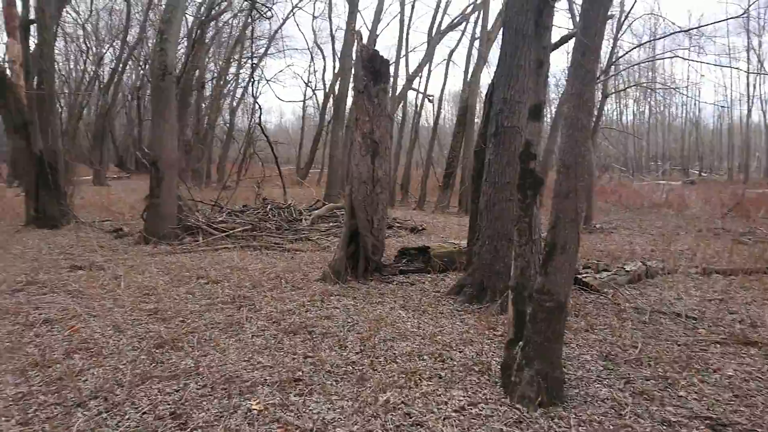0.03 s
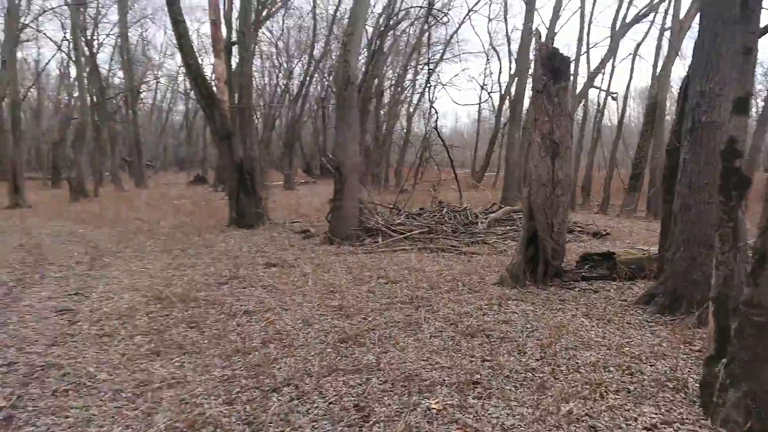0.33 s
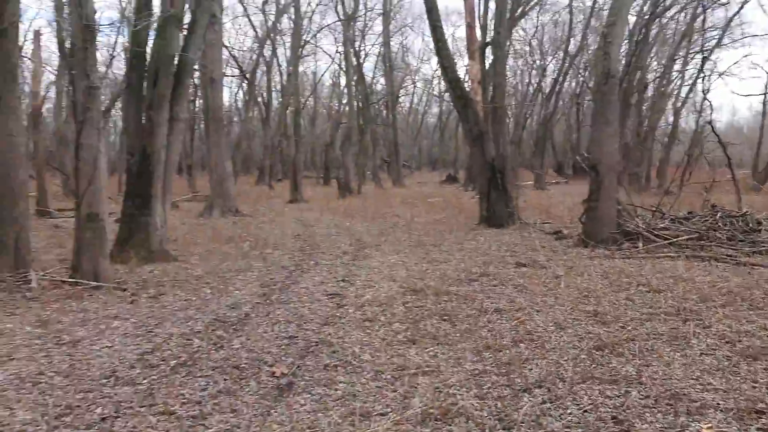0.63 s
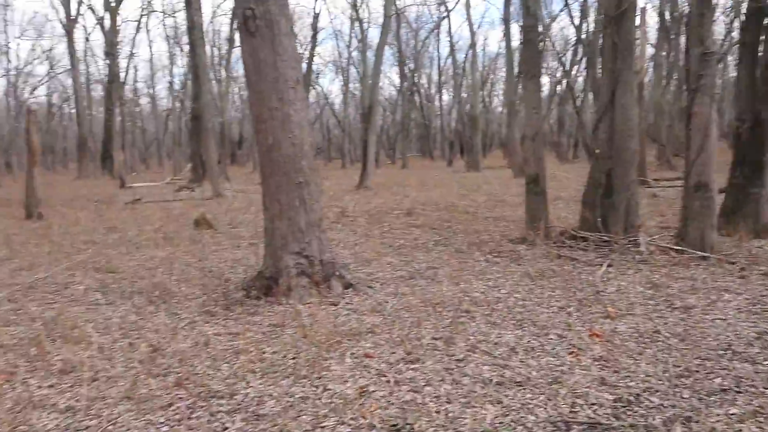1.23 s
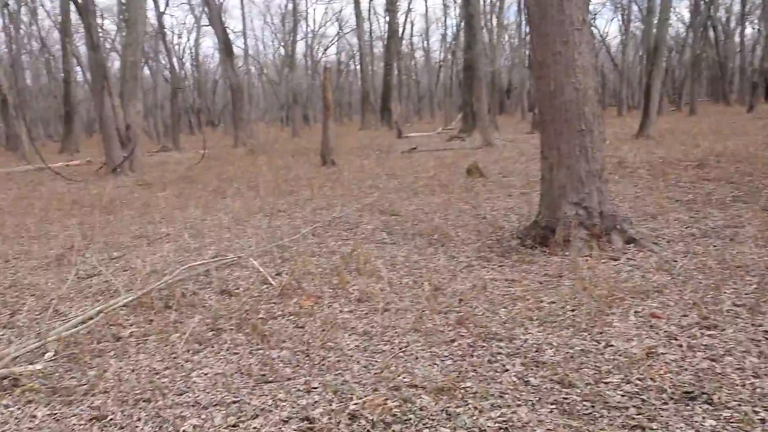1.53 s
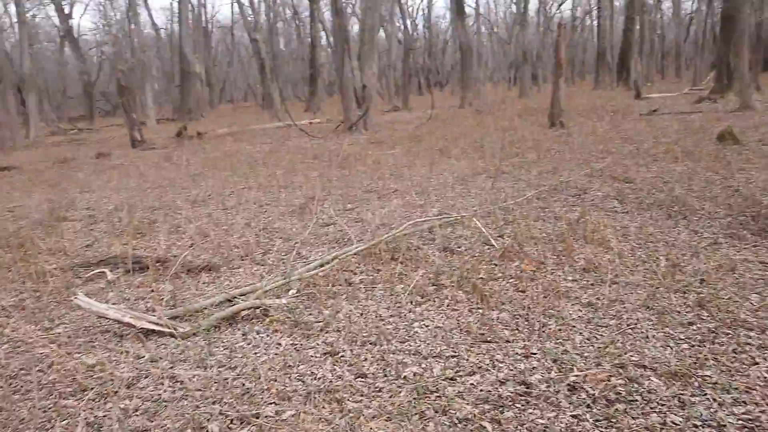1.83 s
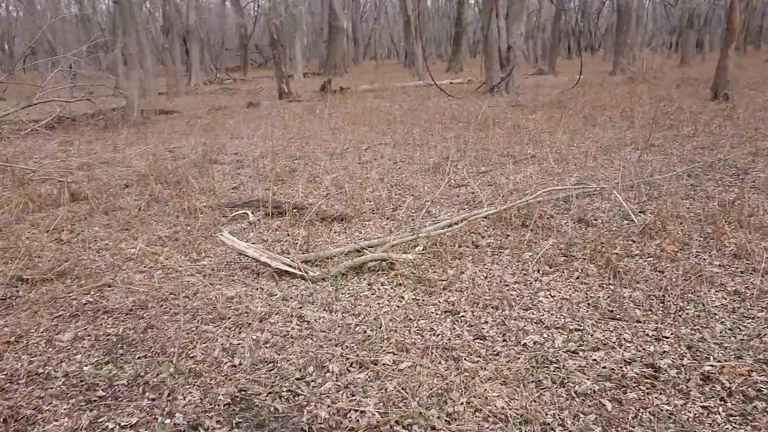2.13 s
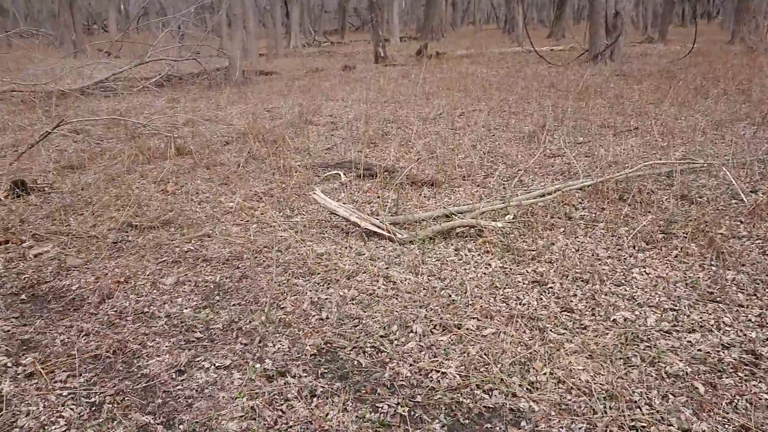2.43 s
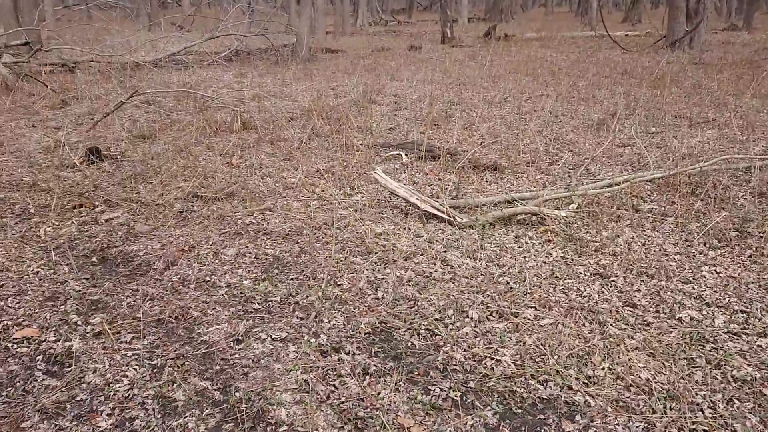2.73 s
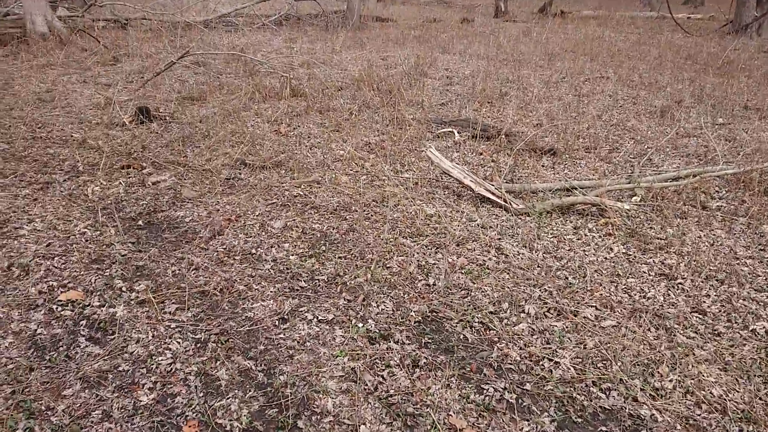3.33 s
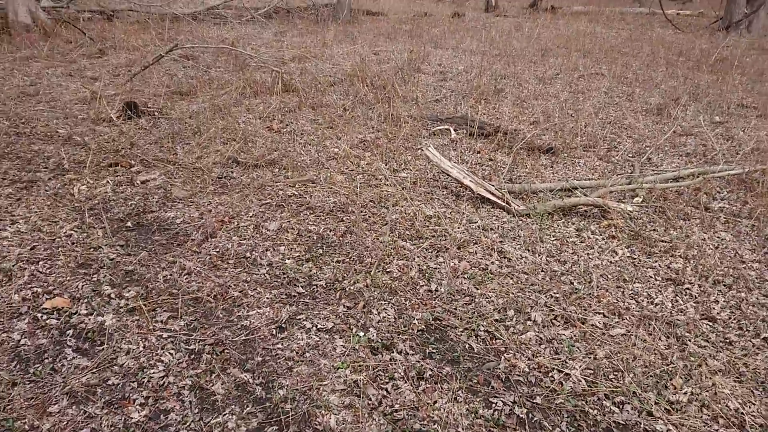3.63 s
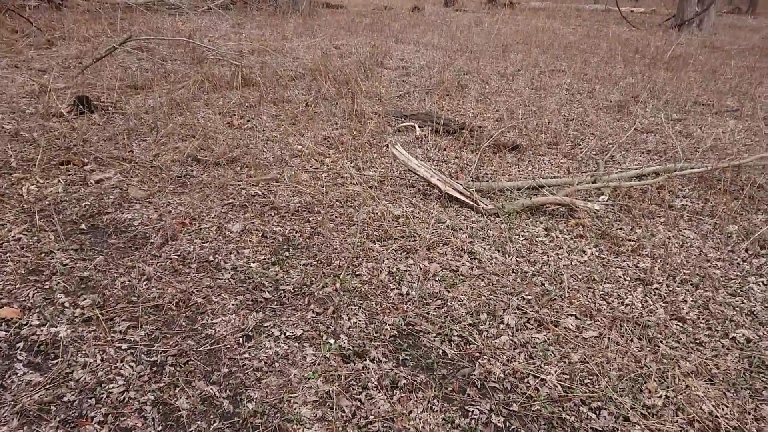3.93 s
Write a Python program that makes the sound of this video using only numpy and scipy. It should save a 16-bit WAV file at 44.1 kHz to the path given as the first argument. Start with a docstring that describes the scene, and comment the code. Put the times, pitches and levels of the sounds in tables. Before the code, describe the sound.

Slow footsteps crunch through dry leaves in open woodland, with small twigs snapping now and then. A dull finger bump on the hand-held microphone comes first, then low wind rumbles and buffets it, strongest near the end.

```python
"""Slow steps crunch through dry leaves in open woodland, heard from a hand-held phone.
Each step crushes thousands of tiny leaf grains; now and then a stalk or twig cracks.
Wind rumbles and buffets on the two microphone ports separately, over a hollow hum on the left
and a thin, far ringing near 3 kHz. A finger bumps the phone as the sound fades in."""
import sys
import numpy as np
from scipy import signal
from scipy.fft import rfft, irfft
from scipy.io import wavfile
from scipy.ndimage import uniform_filter1d

SR = 44100
rng = np.random.default_rng(int(sys.argv[2]) if len(sys.argv) > 2 else 0)


def to_wav(s):
    """Save 16-bit WAV."""
    ch = np.atleast_2d(s).T  # columns
    pcm = np.round(np.clip(ch, -1, 1) * 32767)  # PCM
    wavfile.write(sys.argv[1], SR, pcm.astype(np.int16))


N = 176400
TIME = np.arange(N) / SR
TOP_HZ, PORT_LAG_S = 15650, .0002  # top of the sound; largest lag between the ports

# feet pressing and dragging in the leaves (time [s], hold [s], rise [s], fall [s], level [dB],
# treble lift [dB], crumple centre [Hz], crumple against the step [dB])
FOOTSTEPS = [(0.631, 0.13, .03, 0.036, -48.5, -2.5, 4300, -9),
             (1.053, 0.14, 0.048, 0.042, -46.5, -1.5, 1110, -7),
             (1.487, 0.038, 0.075, 0.057, -38.5, 2, 1620, -16.5),
             (1.675, 0.039, 0.13, 0.088, -39.5, 2.5, 1720, -13.5),
             (2.693, 0.08, 0.061, 0.097, -45.5, 0, 8200, -4.5),
             (2.834, 0.11, 0.088, 0.095, -46.5, 0, 1740, -13),
             (3.134, 0.033, .03, 0.093, -48, 2.5, 8500, -8), (3.391, 0.015, 0.0043, .015, -45, 4, 4500, -4),
             (3.48, 0.12, 0.055, 0.095, -50, 4, 1200, -15),
             (3.774, 0.064, .025, 0.017, -46.5, 0.5, 3500, -4)]
# loose leaves stirring between the steps (time [s], level [dB])
LEAF_STIR = [(0, -60), (.3, -68), (.5, -54.5), (.95, -53), (1.35, -54), (1.85, -51.5), (2.1, -57.5),
             (2.45, -63.5), (3.0, -58.5), (3.3, -50), (3.7, -49.5), (4.0, -57.5)]


def footsteps():
    """Feet crush the litter: a dense fluttering crunch, sparse bright ticks, whole leaves crumpling."""
    crush = leaf_grains(per_s=10000, spread_db=2, ring_s=.00014)
    crush *= undb(1.35 * wander(per_s=160))  # flutter
    folds = leaf_grains(per_s=5000, spread_db=2, ring_s=.00014)
    ticks = leaf_grains(per_s=420, spread_db=3, ring_s=.00007)
    ticks = butter(ticks, 1, hz=3800, kind="high")
    body_power = treble_power = undb(curve(LEAF_STIR)) ** 2
    crumple = 0
    for at, hold, rise, fall, db, treble_db, hz, crumple_db in FOOTSTEPS:
        before, after = np.maximum(at - TIME, 0), np.maximum(TIME - at - hold, 0)
        press = undb(db) * np.exp(-before / rise - after / fall)
        body_power = body_power + press ** 2
        treble_power = treble_power + (press * undb(treble_db)) ** 2
        tuned_folds = unit(signal.lfilter(*signal.iirpeak(hz, Q=1 / .66, fs=SR), folds))
        crumple = crumple + press * undb(crumple_db) * tuned_folds
    body = butter(crush, 1, hz=5200)
    crunch = body * np.sqrt(body_power) + (crush - body) * np.sqrt(treble_power) + crumple
    tick_envelope = np.sqrt(treble_power) ** .67  # ticks grow more slowly than the crunch
    return undb(.5) * crunch + undb(-26.5) * ticks * tick_envelope


def leaf_grains(per_s, spread_db, ring_s):
    """Tiny leaf fractures in stereo, each with its own moment, pitch, strength and direction."""
    moment, pitch, strength, side = rng.random((int(per_s * N / SR), 4)).T
    hz = pitch * TOP_HZ
    gain = undb(-spread_db * np.log(np.maximum(strength, .004)))
    gain *= (-1) ** np.arange(len(hz))  # alternate the polarity
    out = []
    for sign in (-1, 1):
        start = (moment * N + sign * (side - .5) * PORT_LAG_S * SR)[:, None]
        index = np.ceil(start).astype(int) + np.arange(48)
        age = (index - start) / SR
        ring = np.sin(2 * np.pi * hz[:, None] * age) * np.exp(-age / ring_s)
        out.append(np.bincount((index % N).ravel(), (ring * gain[:, None]).ravel(), N))
    return unit(np.array(out))


# single stalks and twigs breaking (time [s], level [dB], centre [Hz], splinter decay [s])
TWIG_CRACKS = [(.3695, -45, 9000, 0.0015), (.4570, -49, 9000, 0.0012), (.5245, -38, 7950, 0.0014),
               (.6098, -32, 6000, 0.0011), (.8330, -41, 7000, 0.0012), (1.0425, -33, 14000, .0012),
               (1.0555, -30, 9000, 0.0036), (1.1225, -41.5, 1200, 0.0084), (1.1660, -17, 4900, .0006),
               (1.857, -31, 11000, 0.0017), (1.9939, -40, 12000, .0008), (2.2000, -43, 9000, 0.0014),
               (3.329, -37, 5000, .001), (3.3409, -39, 3600, 0.0011), (3.3775, -38, 9000, 0.0013),
               (3.3892, -35.5, 7000, 0.0032), (3.427, -38, 2600, 0.0015), (3.4429, -33, 2440, 0.0012),
               (3.5002, -34, 1090, 0.0029), (3.5700, -32, 5200, .0015), (3.634, -38, 3800, 0.00079),
               (3.8480, -38, 3200, 0.0038)]


def twig_cracks(snap_cycles=1.1):
    """Each stalk snaps, then splinters for milliseconds; it reaches one port just before the other."""
    out = np.zeros((2, N))
    for at, db, hz, decay in TWIG_CRACKS:
        age = np.maximum(TIME - at, 0)
        snap = np.sin(2 * np.pi * hz * age) * np.exp(-np.minimum(age * hz / snap_cycles, 20))
        tail = (TIME >= at) * np.exp(-np.minimum(age / decay, 20))
        crack = snap + burst(noise_band(hz, width_hz=1.02 * hz), tail)
        lag = int(rng.uniform(-.43, .95) * PORT_LAG_S * SR)
        out += undb(db - 1) * np.array([crack, np.roll(crack, lag)])
    return out


# tone of the ground sounds at each port (frequency [Hz], gain [dB])
LEFT_PORT_EQ = [(200, -16), (600, -1), (1200, 0), (2100, -1.5), (3100, 3.5), (5300, 1.5), (6500, -5),
                (7700, 0.5), (9900, 1.5), (11000, -8), (11600, -16), (12400, -11), (13600, -11.5),
                (15400, 0)]
RIGHT_PORT_EQ = [(200, -14.5), (600, -4.5), (1600, 1), (2400, -2.5), (4700, 0), (5850, -4.5), (6600, 1.5),
                 (7800, 1), (8900, 1), (11000, 1.5), (13500, 0), (15000, 2)]


def ground_to_ports(ground, echo_s=.0016, echo_db=-13):
    """A swaying echo off the ground joins the ground sound; the phone's body colours it at each port."""
    samples = np.arange(N)
    sides = []
    for side in ground:
        delay = echo_s * SR * (1 + .156 * wander(per_s=1))
        sides.append(side + undb(echo_db) * np.interp(samples - delay, samples, side))
    left, right = sides
    return np.array([undb(-2.5) * colour(left, LEFT_PORT_EQ), colour(right, RIGHT_PORT_EQ)])


# wind strength on the ports (time [s], left level [dB], right level [dB])
WIND_LEVELS = [(0, -52, -49.5), (.3, -46, -44.5), (.5, -38.5, -41.5), (.9, -37.5, -36.5),
               (1.2, -35.5, -40.5), (1.5, -37, -50.5), (1.75, -32.5, -41.5), (2.0, -38.5, -44.5),
               (2.15, -32, -47), (2.25, -37, -36.5), (2.65, -38, -37.5), (3.0, -32, -36.5),
               (3.15, -36.5, -35), (3.42, -25.5, -28.5), (3.62, -40.5, -37.5), (4.0, -32, -34)]
# deep tone of the rumble (frequency [Hz], gain [dB])
RUMBLE_EQ = [(10, -76), (24, -39), (32, -16.5), (42, -10), (55, -1.5), (72, 0), (100, -7.5), (150, -15.5),
             (250, -27), (400, -37), (800, -62), (2000, -73)]
# eddies striking one port (time [s], half length [s], level [dB], upper edge [Hz], port [0 left, 1 right])
EDDIES = [(.895, 0.029, -35.5, 79, 1), (1.197, 0.018, -38.5, 142, 0), (1.562, .015, -22.5, 196, 0),
          (1.619, 0.034, -28.5, 165, 0), (2.065, .006, -26, 220, 0), (2.116, 0.019, -18, 114, 0),
          (2.234, 0.018, -34.5, 130, 1), (2.823, 0.017, -25, 90, 0), (2.888, 0.014, -26, 140, 0),
          (3.592, 0.024, -25.5, 100, 1)]


def wind(steady_s=.18, flicker_db=4):
    """Mostly unrelated turbulence on each port, with short eddies that reach higher; sub-bass is cut."""
    out = np.zeros((2, N))
    shared = .33 * rng.standard_normal(N)
    for port in range(2):
        rumble = unit(colour(shared + rng.standard_normal(N), RUMBLE_EQ))
        rumble /= np.sqrt(uniform_filter1d(rumble ** 2, int(steady_s * SR)))  # even out chance swells
        out[port] = rumble * undb(curve(WIND_LEVELS, port + 1) + flicker_db * wander(per_s=14))
    for at, half, db, edge_hz, port in EDDIES:
        eddy = butter(rng.standard_normal(N), 3, hz=[40, edge_hz], kind="band")
        out[int(port)] += undb(db) * burst(eddy, swell(at, half))
    return signal.sosfiltfilt(signal.butter(4, 30, "high", fs=SR, output="sos"), out)


# modes of the bumped case (frequency [Hz], level [dB], time to fall 60 dB [s])
CASE_MODES = [(444, 3, 0.025), (283, 4.5, 0.016), (75.5, -8, 0.088)]


def finger_bump(at=.2177):
    """A finger lands on the case next to the left port: a dull bump, then a short scuff."""
    age = np.maximum(TIME - at, 0)
    modes = sum(undb(db - 60 * age / t60) * np.sin(2 * np.pi * hz * age) for hz, db, t60 in CASE_MODES)
    bump = butter(modes, 4, hz=700)
    scuff = noise_band(hz=3060, width_hz=1700) * swell(at=.267, half_s=.018)
    return np.array([undb(-20.5) * bump + undb(-51) * scuff, np.zeros(N)])


# tone of the hum (frequency [Hz], gain [dB])
HUM_EQ = [(60, -15.5), (150, -5.5), (280, -4), (380, -2.5), (470, 2), (540, -3), (660, -17), (1000, -26.5),
          (2500, -64)]


def hollow_hum():
    """Noise with a hollow peak near 470 Hz, on the left only."""
    hum = unit(colour(rng.standard_normal(N), HUM_EQ))
    return np.array([undb(-45) * hum, np.zeros(N)])


# tone of the distant woodland (frequency [Hz], gain [dB])
AIR_EQ = [(60, 0), (250, 3), (450, -1), (850, -3), (1400, -12), (2200, -14), (5000, -29), (15000, -47)]


def woodland_air():
    """A soft, dark bed of distant air, half of it common to both sides."""
    shared = rng.standard_normal(N)
    sides = [unit(colour(shared + rng.standard_normal(N), AIR_EQ)) for _ in range(2)]
    return undb(-57) * np.array(sides)


# glide of the far ringing (time [s], centre [Hz], level [dB])
RING_GLIDE = [(0, 2900, -66), (.45, 3080, -70.5), (1.0, 2950, -67), (1.6, 3050, -74), (1.95, 3280, -66.5),
              (2.42, 3280, -71.5), (2.6, 2950, -71), (4.0, 2900, -64)]


def far_ringing():
    """A thin band of noise whose pitch wavers around 3 kHz."""
    noise = rng.standard_normal((2, N)) + 1j * rng.standard_normal((2, N))
    narrow = butter(noise, 2, hz=144)
    carrier = np.exp(2j * np.pi * np.cumsum(curve(RING_GLIDE)) / SR)
    return unit((narrow * carrier).real) * undb(curve(RING_GLIDE, 2))


def undb(db):
    """Decibels to gain."""
    return 10 ** (np.asarray(db) / 20)


def unit(x):
    """Scale to rms 1."""
    return x / np.sqrt(np.mean(x ** 2))


def curve(table, column=1):
    """Join the rows of a table by straight lines in time."""
    rows = np.array(table)
    return np.interp(TIME, rows[:, 0], rows[:, column])


def butter(x, order, hz, kind="low"):
    """Causal filter with a flat passband."""
    return signal.sosfilt(signal.butter(order, hz, kind, fs=SR, output="sos"), x)


def colour(x, points):
    """Minimum-phase EQ through points of (frequency [Hz], gain [dB])."""
    hz, db = np.array(points).T
    bins = np.maximum(np.fft.rfftfreq(N, 1 / SR), 1)
    gain = undb(np.interp(np.log(bins), np.log(hz), db))
    cepstrum = irfft(np.log(gain), N)
    cepstrum[1:N // 2] *= 2
    cepstrum[N // 2 + 1:] = 0
    return irfft(rfft(x) * np.exp(rfft(cepstrum)), N)


def noise_band(hz, width_hz):
    """Noise through the same resonance twice, rms 1."""
    bins = np.maximum(np.fft.rfftfreq(N, 1 / SR), 1)
    resonance = 1 / (1 + 1j * (bins / hz - hz / bins) * hz / width_hz)
    return unit(irfft(rfft(rng.standard_normal(N)) * resonance ** 2, N))


def wander(per_s):
    """Smooth random drift, rms 1."""
    span = int(SR / per_s)
    held = rng.standard_normal(N)[np.arange(N) // span]
    return unit(uniform_filter1d(uniform_filter1d(held, span), span))


def swell(at, half_s):
    """Bell-shaped envelope."""
    return np.exp(-.5 * ((TIME - at) / half_s) ** 2)


def burst(noise, shape):
    """Noise under an envelope, with the energy of that envelope."""
    return noise * shape * np.sqrt(np.sum(shape ** 2) / np.sum((noise * shape) ** 2))


def scene():
    """Leaves and twigs up front, wind and finger on the phone, a quiet bed behind."""
    ground = ground_to_ports(footsteps() + twig_cracks())
    return ground + wind() + finger_bump() + hollow_hum() + woodland_air() + far_ringing()


# opening fade; the last gain holds to the end (time [s], gain [dB])
FADE_IN = [(.08, -87), (.1, -27.5), (.16, -21), (.21, -9.5), (.33, -5)]


def record(dry):
    """The phone fades in and cuts the top."""
    top_cut = signal.ellip(10, .2, 80, TOP_HZ, fs=SR, output="sos")
    return signal.sosfilt(top_cut, dry * undb(curve(FADE_IN)))


dry = scene()
out = record(dry)
to_wav(out)
```